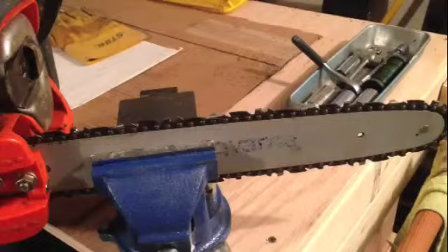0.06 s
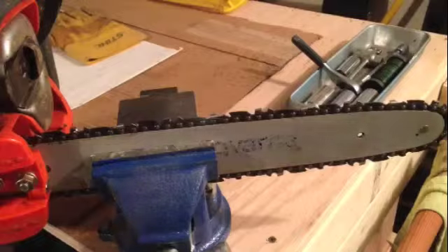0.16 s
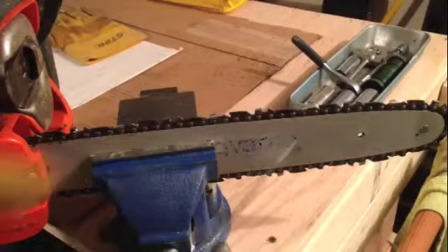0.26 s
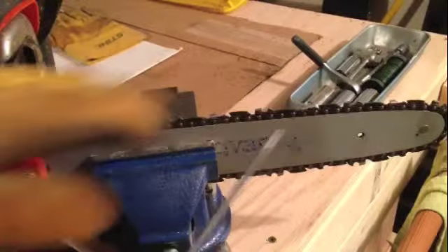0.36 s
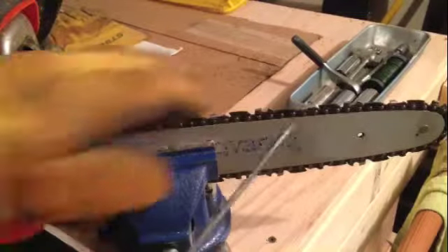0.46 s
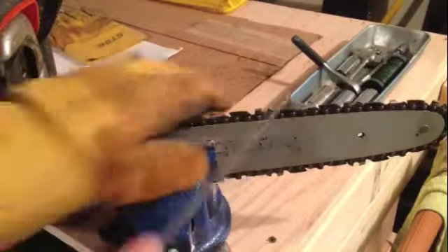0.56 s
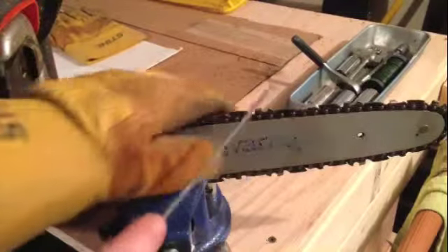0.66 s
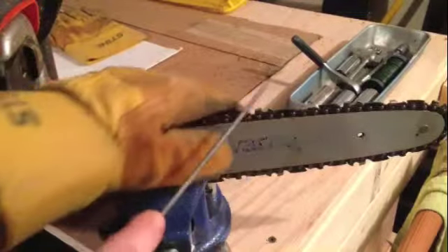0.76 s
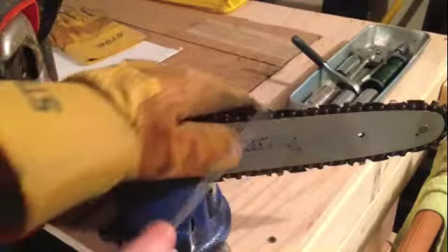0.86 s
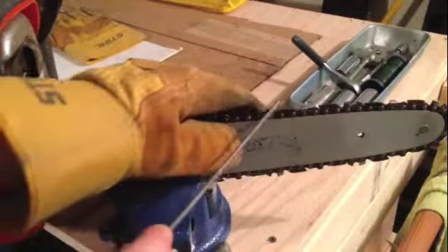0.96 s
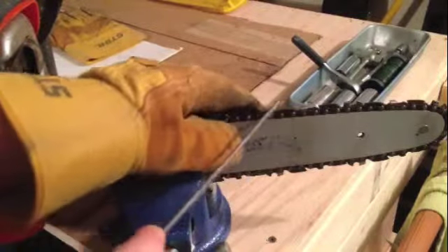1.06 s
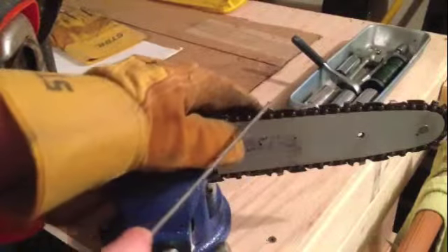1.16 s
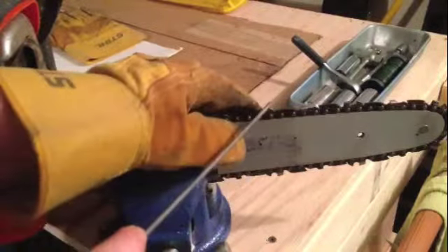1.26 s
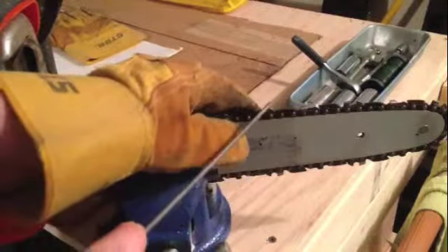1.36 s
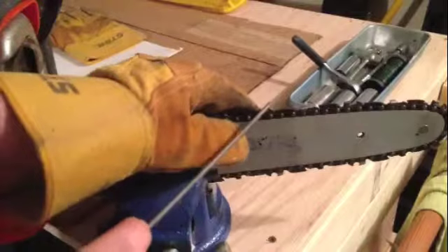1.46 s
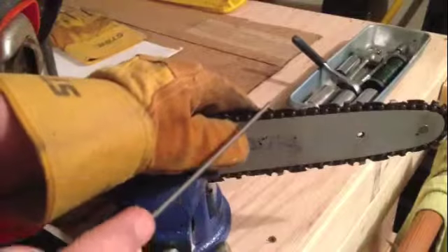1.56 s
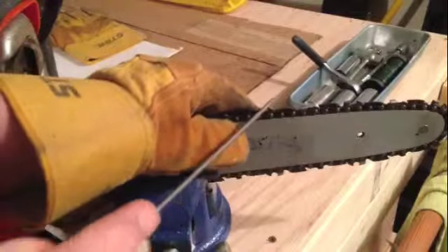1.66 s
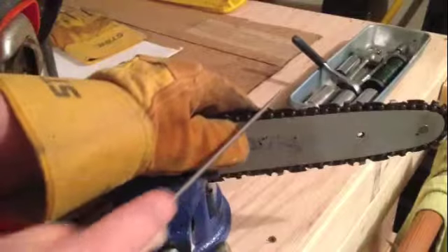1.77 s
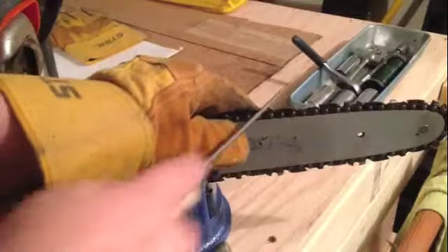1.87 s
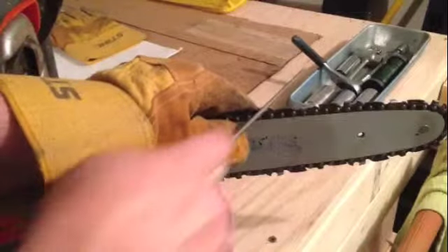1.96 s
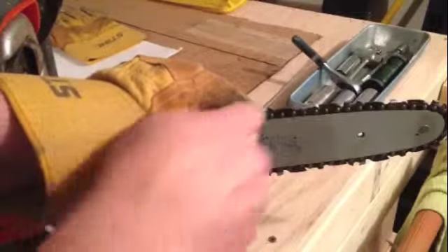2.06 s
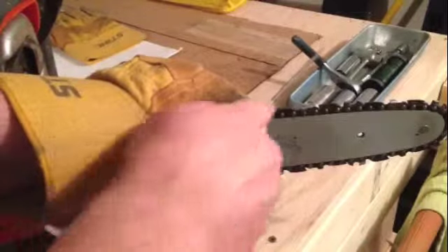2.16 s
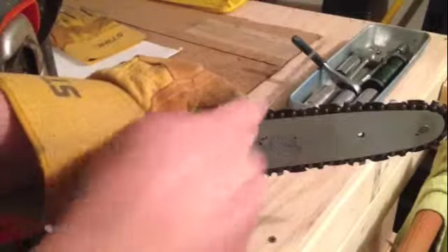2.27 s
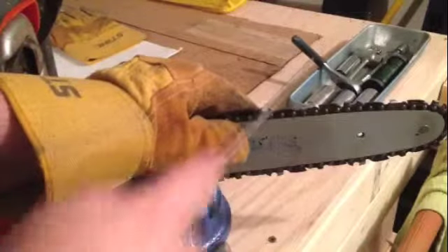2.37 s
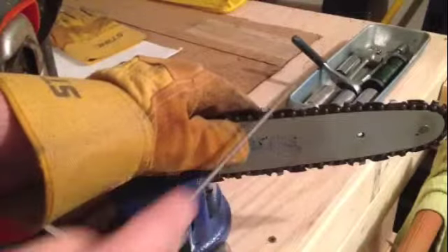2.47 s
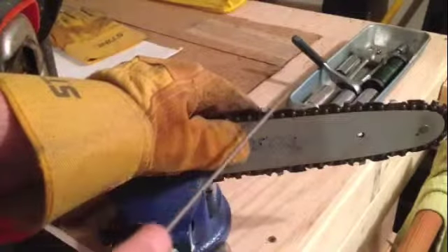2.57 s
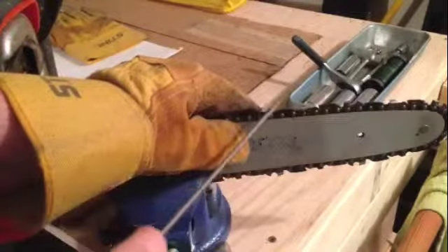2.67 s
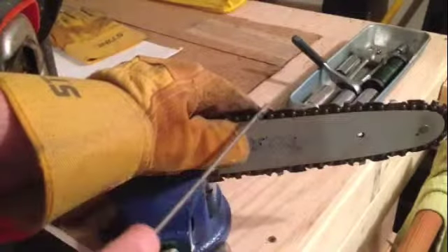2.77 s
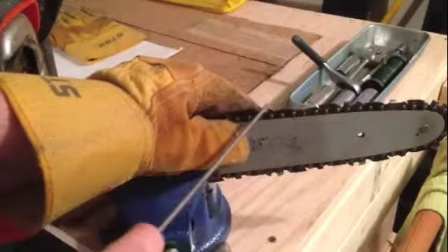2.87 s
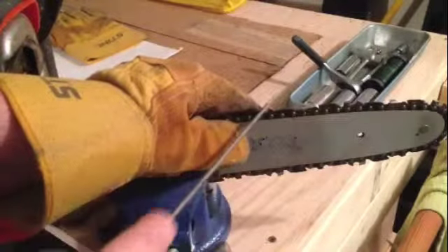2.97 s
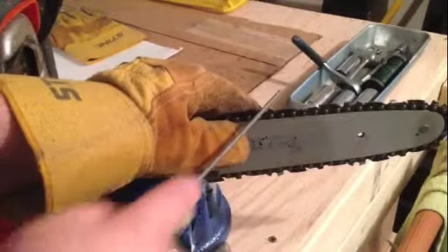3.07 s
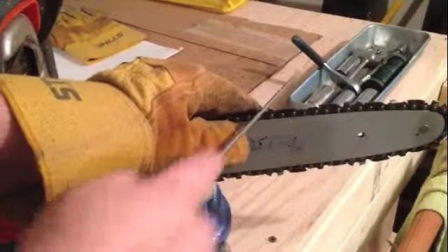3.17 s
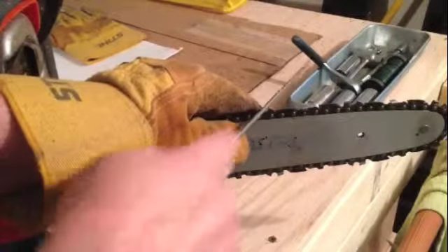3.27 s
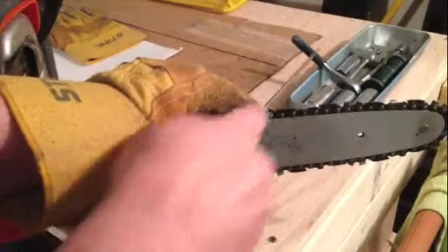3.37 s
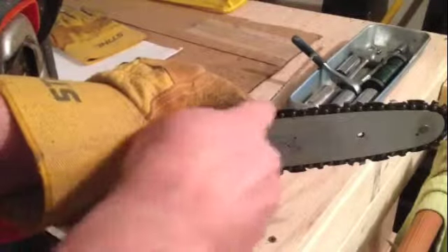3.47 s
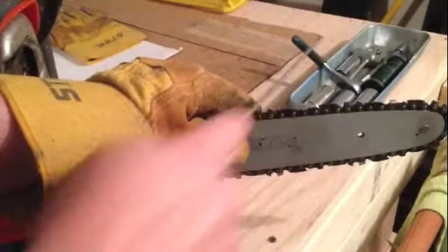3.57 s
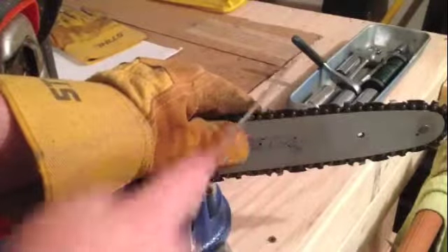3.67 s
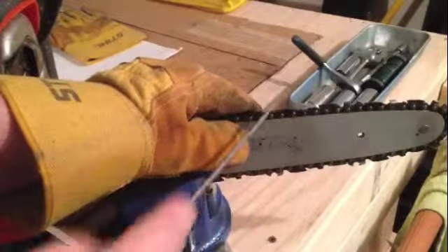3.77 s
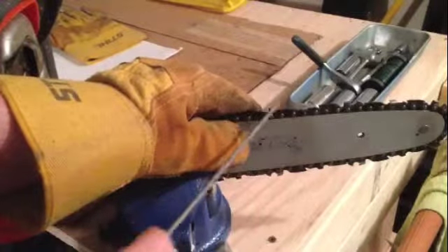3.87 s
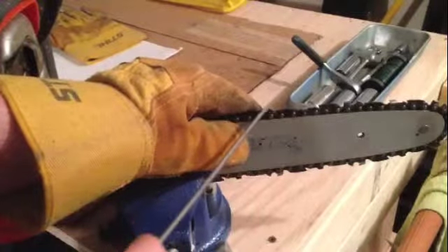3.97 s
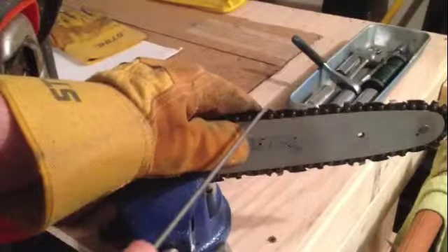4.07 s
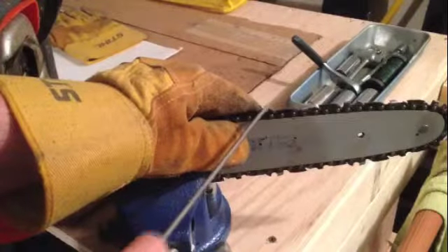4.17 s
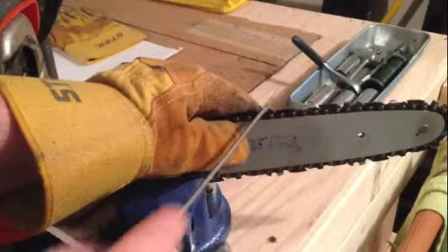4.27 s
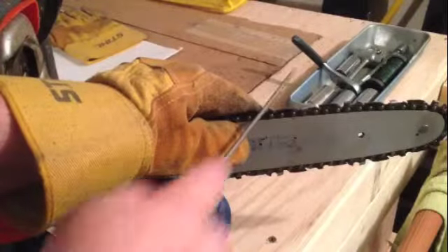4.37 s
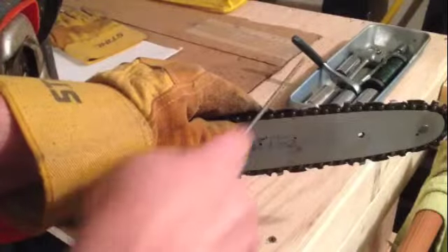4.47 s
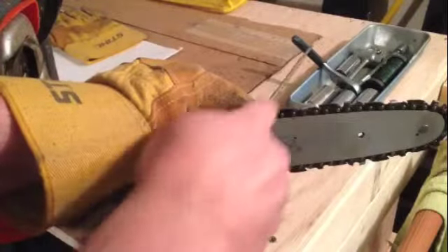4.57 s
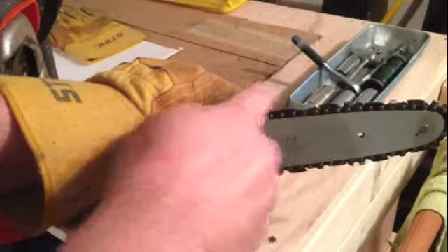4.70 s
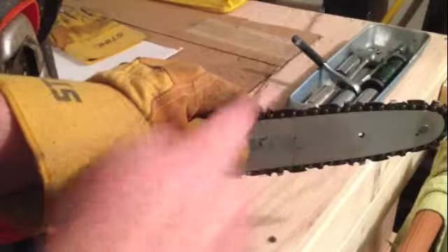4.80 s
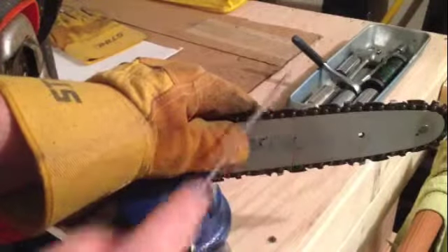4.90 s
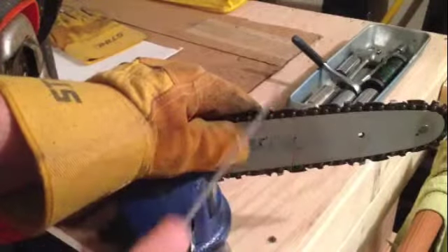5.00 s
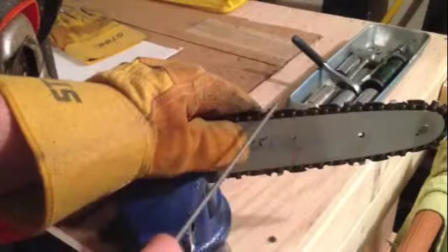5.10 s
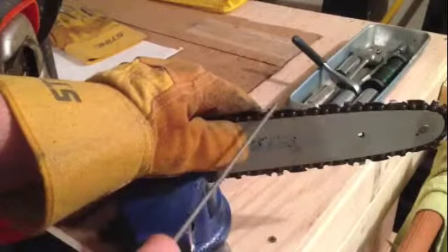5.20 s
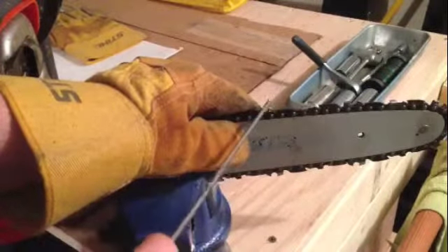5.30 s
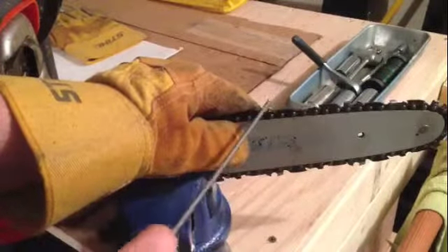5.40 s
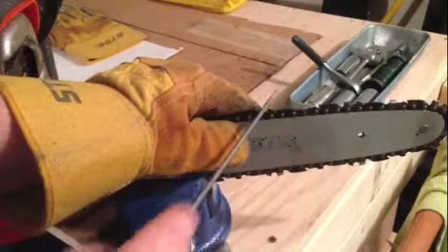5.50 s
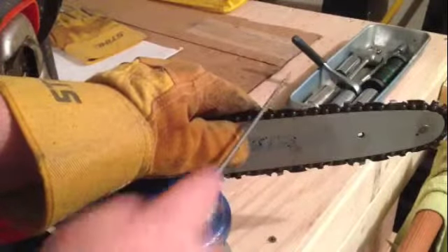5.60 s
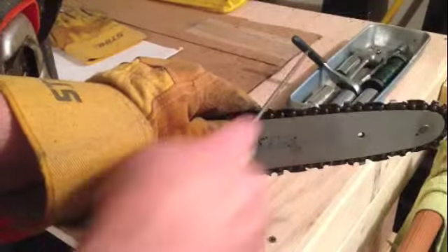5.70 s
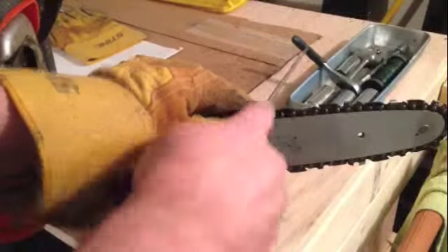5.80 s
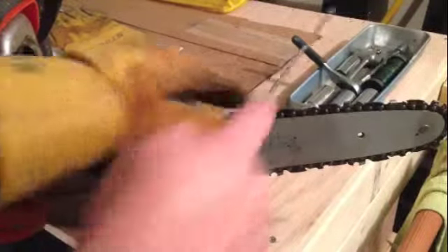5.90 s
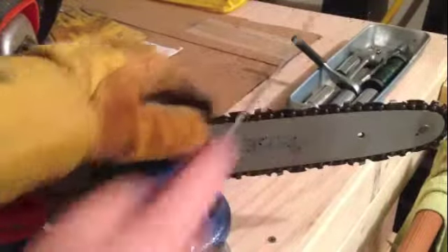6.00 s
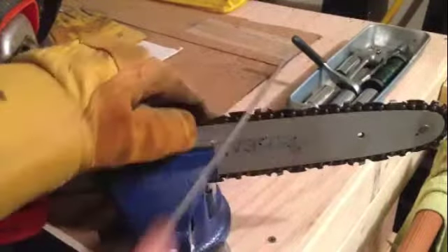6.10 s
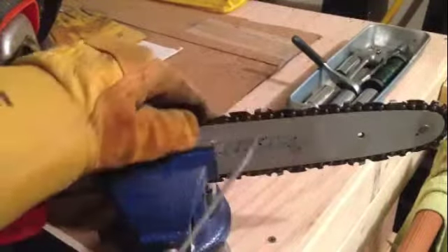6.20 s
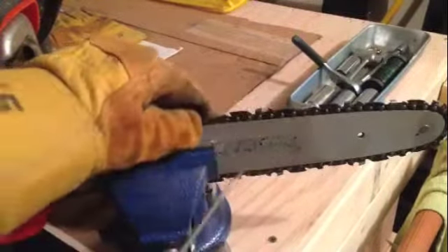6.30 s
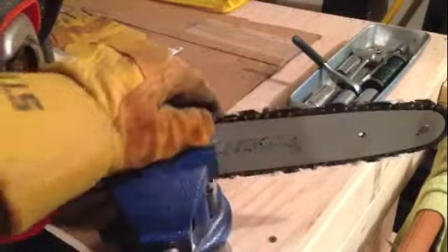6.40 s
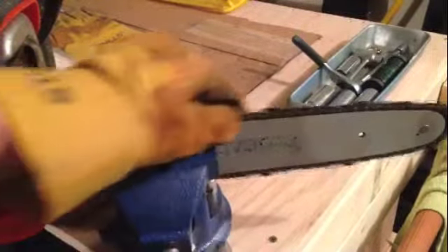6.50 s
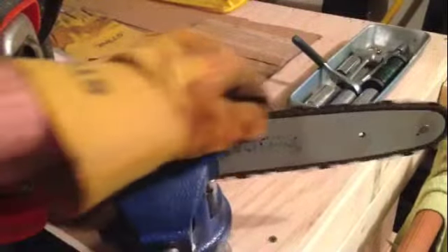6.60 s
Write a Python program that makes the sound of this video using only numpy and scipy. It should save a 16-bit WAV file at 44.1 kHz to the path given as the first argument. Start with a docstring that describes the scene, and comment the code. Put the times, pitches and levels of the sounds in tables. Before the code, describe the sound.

Close in a small cluttered workshop, leather gloves rustle and bump softly on bench and vise, then a thin file taps steel sharply. Four short, gritty push strokes follow, each rasping with a rising, buzzing whine. Between them come faint scraping returns, light skids and crisp taps. Finally chain links click loudly and the chain rattles along its bar. Small microphone, little bass, faint hiss.

```python
"""Filing a saw chain

A round file is pushed four times over a cutter of a saw chain whose bar sits in a bench vise, in a workshop.
Its teeth bite as noise pulsed at the tooth rate, which rings file, bar and bench through resonators.
Between strokes the file slides back, skates and taps the steel, heard as filtered clicks and decaying modes.
Links tick, gloved hands rustle and knock as shaped noise, and at the end the chain is pulled along the bar."""
import sys
import numpy as np
from scipy import signal
from scipy.fft import rfft, irfft
from scipy.io import wavfile
from scipy.ndimage import uniform_filter1d

SR = 44100
rng = np.random.default_rng(int(sys.argv[2]) if len(sys.argv) > 2 else 0)


def voltage_ratio(level):
    """Linear amplitude factor for a level in decibels (scalar or array-like)."""
    return 10 ** (np.asarray(level, float) / 20)


def master(y):
    """Save y as 16-bit WAV."""
    cut = np.clip(np.atleast_2d(y).T, -1, 1)
    pcm = np.round(cut * 32767)  # scale
    wavfile.write(sys.argv[1], SR, pcm.astype(np.int16))


N = 293265
TIME = np.arange(N) / SR

# bar, cutter and bench under the file: (frequency [Hz], width [Hz], level [dB])
HELD_STEEL = [(137.7, 8.8, -8), (170.5, 12.6, -6.5), (259.3, 11.7, 7.5), (357, 45, -4.5), (528, 59, 1),
              (1198, 520, -3.5), (2380, 25, -18), (2882, 207, 1), (3133, 150, -2.5), (3360, 83, -24),
              (4190, 54, -5), (4800, 1070, -7), (5490, 250, -6.5), (5860, 300, -9), (6620, 380, -7.5),
              (8480, 240, -10.5), (10600, 220, -14), (13400, 350, -19)]
# bending modes of the file: (frequency [Hz], level [dB], t60 at damping 0.5 [s])
FILE_MODES = [(1226, -2, 0.054), (2363, -4, 0.048), (3744, 3, 0.032), (5360, 1, 0.019), (6340, 0.5, 0.034),
              (7080, -22, 0.06), (8250, -10.5, 0.062), (10610, -3, 0.031), (12100, -21, 0.018),
              (13300, -9, 0.027), (14500, -33, 0.011)]


def unit(x):
    """Normalisation: scale to rms 1."""
    return x / np.sqrt(np.mean(x ** 2))


def band(x, lo_hz, hi_hz):
    """Band limitation by a Butterworth band-pass."""
    sos = signal.butter(2, [lo_hz, min(hi_hz, 0.45 * SR)], "band", fs=SR, output="sos")
    return signal.sosfilt(sos, x)


def colour(x, points):
    """Spectral shaping by (frequency [Hz], gain [dB]) points joined on a log-frequency axis."""
    hz, db = np.transpose(points)
    f = np.maximum(np.fft.rfftfreq(len(x), 1 / SR), 1)
    gain = voltage_ratio(np.interp(np.log(f), np.log(hz), db))
    return irfft(rfft(x) * gain, len(x))


def walk(rate):
    """Slow random modulation: independent levels, 1 / rate s apart, joined by ramps; rms 1."""
    k = int(SR / rate)
    held = np.repeat(rng.standard_normal(N // k + 1), k)
    return unit(uniform_filter1d(held, k)[:N])


def grit(per_s, spread_db):
    """Friction as a random impulse train: dense clicks of uneven size, rms 1."""
    hit = rng.random(N) < per_s / SR
    size = rng.standard_normal(N) * voltage_ratio(spread_db * rng.exponential(size=N))
    return unit(hit * size)


def three_way(x, low_hz, high_hz, ref_hz):
    """Band splitting into low, middle and upper parts, each at rms 1 (upper: within ref_hz)."""
    low, mid, high = band(x, 122, low_hz), band(x, low_hz, high_hz), band(x, high_hz, 15100)
    return unit(low), unit(mid), high / np.std(band(high, *ref_hz))


def resonate(x, peaks, wander_db, rate):
    """Parallel resonances, each swelling and fading on its own as the contact point moves."""
    out = 0
    for hz, width, db in peaks:
        b, a = signal.iirpeak(hz, hz / width, SR)
        out = out + voltage_ratio(db + wander_db * walk(rate)) * signal.lfilter(b, a, x)
    return out


def gestures(events, ramp_s):
    """Amplitude envelope of movements that swell, hold and ease off."""
    gain = 0
    for start, length, db in events:
        nearest_end = np.minimum(TIME - start, start + length - TIME)
        gain = gain + voltage_ratio(db) * np.clip(nearest_end / ramp_s, 0, 1)
    return gain


def strike(events, modes, crack_db):
    """Modal impact: a crack with a rough tail plus modes weighted by contact colour and damped by the grip."""
    low_modes_hz = 4500  # an event's optional low-mode level acts under this
    out, t = np.zeros(N + SR), np.arange(SR // 4) / SR
    hz, db, t60 = (c[:, None] for c in np.transpose(modes))
    for s, peak_db, contact_hz, damping, *low_db in events:
        chance = rng.standard_normal((3, len(modes), 1))
        contact_db = -2.26 * np.log2(hz / contact_hz) ** 2
        share = voltage_ratio(db + sum(low_db) * (hz < low_modes_hz) + 2.4 * chance[0] + contact_db)
        # decay time runs from twice t60 at damping 0 to a quarter of it at 1.5
        damped_t60 = t60 * 4 ** (0.5 - np.clip(damping, 0, 1.5))
        fade = np.exp(-np.log(1000) * t / damped_t60)
        # each mode rings unevenly
        fade = fade * (1 + 3.7 * uniform_filter1d(rng.standard_normal(fade.shape), size=60, axis=1))
        tone = np.sin(2 * np.pi * hz * (1 + 0.012 * chance[2]) * t)
        ring = np.sum(share * np.sign(chance[1]) * fade * tone, axis=0)
        # a sharp onset, then a weak buzz
        burst = rng.standard_normal(len(t)) * (np.exp(-t / 0.00024) + 0.054 * np.exp(-t / 0.0078))
        crack = band(burst, contact_hz / 1.47, contact_hz * 1.37)
        crack = band(crack, contact_hz / 2.23, 21000)
        blow = ring / np.abs(ring).max() + voltage_ratio(crack_db) * crack / np.abs(crack).max()
        blow = band(blow, 340, 21000)  # small steel parts radiate no bass
        i = int((s + 0.001) * SR)  # the blow starts 1 ms after its listed time
        out[i:i + len(t)] += voltage_ratio(peak_db) * blow / np.abs(blow).max()
    return out[:N]


def hiss():
    """Stationary noise floor of room and microphone: Gaussian noise with a shaped spectrum."""
    level_db = -63.5
    # spectrum of the floor: (frequency [Hz], gain [dB])
    floor_colour = [(18, -48), (30, -21), (81, -12), (256, 5), (324, -1.5), (1260, -11.5), (8500, -11),
                    (14300, -14.5), (15500, -12.5)]
    return voltage_ratio(level_db) * unit(colour(rng.standard_normal(N), floor_colour))


def rustle():
    """Fine friction of leather and cloth: coloured clicks whose bands flicker independently."""
    ramp_s, low_db = 0.11, -1
    # gloves and sleeves moving: (start [s], length [s], level [dB], leather creak over the level [dB])
    moves = [(0.002, 0.29, -59.5, -6), (0.251, 1.0, -58, -6), (1.302, 0.76, -66.5, -5.5),
             (2.15, 0.82, -63, -6.5), (3.497, 0.27, -61, -8), (3.88, 0.7, -60.5, -3.5),
             (4.65, 0.24, -63.5, -6), (5.0, 0.45, -59, -2.5), (5.42, 0.17, -61.5, -4),
             (5.85, 0.39, -57, -3.5), (6.192, 0.36, -58.5, -2)]
    # spectrum of the rubbing: (frequency [Hz], gain [dB])
    rub_colour = [(59, -55), (100, -6), (196, 9.5), (238, 6), (712, 13), (1090, -0.5), (1370, 0.5),
                  (3180, -17.5), (5750, -18), (6660, -20.5), (15500, -48)]
    low, mid, high = three_way(colour(grit(5000, 0.55), rub_colour), 457, 2404, (2500, 8000))
    high = high * voltage_ratio(1.3 * walk(25))
    rub = voltage_ratio(-2.0) * high + voltage_ratio(low_db + 2 * walk(11)) * low
    rub_gain = gestures([row[:3] for row in moves], ramp_s)
    creak_gain = gestures([(s, length, db + creak_db) for s, length, db, creak_db in moves], ramp_s)
    return rub_gain * rub + creak_gain * voltage_ratio(2 * walk(6.7)) * mid


def knocks():
    """Padded impacts: gloves excite a fading puff of noise in one broad band."""
    # blows on bench and vise: (time [s], peak level [dB], centre frequency [Hz], t60 [s])
    thuds = [(0.349, -36, 2700, 0.15), (0.349, -40, 900, 0.051), (0.479, -47.5, 1160, 0.16),
             (0.572, -34, 1240, 0.035), (0.591, -42, 1330, 0.088), (0.616, -45, 1400, 0.052),
             (0.849, -35.5, 566, 0.081), (0.85, -38.5, 1110, 0.048), (0.995, -36, 1440, 0.23),
             (1.089, -42.5, 1470, 0.083), (5.351, -39, 288, 0.03), (1.573, -49, 302, 0.29),
             (1.704, -30.5, 340, 0.54), (5.521, -36.5, 312, 0.2), (5.865, -51, 489, 0.11),
             (5.915, -44.5, 524, 0.12)]
    out, t = np.zeros(N + SR), np.arange(SR // 4) / SR
    for s, peak_db, hz, t60 in thuds:
        fade = np.exp(-np.log(1000) * t / t60) + 0.28 * np.exp(-t / 0.00033)
        puff = band(rng.standard_normal(len(t)) * fade, hz / 1.43, hz * 1.32)
        i = int(s * SR)
        out[i:i + len(t)] += voltage_ratio(peak_db) * puff / np.abs(puff).max()
    return out[:N]


def chain_drag():
    """Rattling contact excitation: links run in the groove of the bar and, once pulled, shake the bench."""
    start_s, pull_s, rise_s = 6.44, 6.49, 0.023  # links take up slack, then the pull
    slack_db, pull_db, sag_db_per_s, bench_db = -48, -36.5, -19, -9
    # spectrum of the rattle: (frequency [Hz], gain [dB])
    drag_colour = [(59, -60), (100, -36), (248, -1.5), (293, -12), (758, -6.5), (956, -28.5), (2090, -4.5),
                   (5630, 0.5), (15500, -21)]
    slack = voltage_ratio(slack_db) * np.clip((TIME - start_s) / rise_s, 0, 1)
    since_pull = (TIME - pull_s).clip(0)
    pull = np.clip(since_pull / rise_s, 0, 1) * voltage_ratio(pull_db + sag_db_per_s * since_pull)
    low, mid, high = three_way(colour(grit(7000, 0.82), drag_colour), 720, 1330, (2500, 10000))
    rattle = np.maximum(slack, pull) * (high + voltage_ratio(-9.0) * mid)
    return voltage_ratio(2 * walk(70)) * (rattle + voltage_ratio(bench_db) * pull * low)


def links():
    """Modal impacts of chain links clicking together, short and high."""
    # modes of a link: (frequency [Hz], level [dB], t60 at damping 0.5 [s])
    link_modes = [(3900, -24, 0.0028), (5660, 6, 0.0099), (6250, 0, 0.022), (7760, -19, 0.0015),
                  (10700, -12, 0.0075)]
    # clicks: (time [s], peak level [dB], contact colour [Hz], damping [0-1.5])
    clicks = [(1.417, -47, 6200, 0.7), (1.4458, -30, 5900, 0.1), (2.4757, -30, 6900, 1.4),
              (2.4865, -27, 6800, 1.4), (2.5037, -31.5, 6360, 1.4), (6.3769, -29, 6760, 0.4),
              (6.419, -10.5, 5400, 0), (6.4342, -16, 5930, 0.6), (6.4418, -10.5, 5840, 0.3),
              (6.4506, -23, 6240, 0), (6.4664, -34, 4950, 0.7)]
    return strike(clicks, link_modes, crack_db=5)


def skids():
    """Light sliding friction: the file skates on the cutter without cutting and its modes whisper."""
    # slides: (start [s], length [s], level at the swell [dB])
    slides = [(1.196, 0.014, -45.5), (2.582, 0.13, -54.5), (2.798, 0.023, -44.5), (2.892, 0.16, -64),
              (3.889, 0.12, -52.5), (4.015, 0.011, -42.5), (5.308, 0.026, -40), (5.48, 0.1, -48),
              (6.354, 0.073, -52.5)]
    pressure = 0
    for s, length, db in slides:
        swell = np.interp(TIME, [s, s + 0.57 * length, s + length], [0.3, 1, 0.6], 0, 0)
        pressure = pressure + voltage_ratio(db) * swell
    rub = grit(9700, 0.84)
    # sliding contact broadens the modes and favours those near 4200 Hz
    peaks = [(hz, 9 / t60, db - 5 * np.log2(hz / 4200) ** 2) for hz, db, t60 in FILE_MODES]
    whisper = resonate(rub, peaks, wander_db=4.0, rate=46) + 0.14 * band(rub, 2150, 5100)
    return uniform_filter1d(pressure, size=200) * unit(whisper)


def returns():
    """Resonant friction: drawn back lightly, the file scrapes and its whistle sinks as the hand slows."""
    whistle_db = -4
    # return strokes: (start [s], length [s], level [dB], whistle from [Hz], whistle to [Hz])
    glides = np.array([(2.25, 0.25, -63, 2250, 2160), (3.547, .22, -64, 1607, 1507),
                       (4.987, 0.4, -61, 1700, 1612), (5.878, 0.37, -60.5, 1923, 1290)])
    # resonances of the scrape: (frequency [Hz], width [Hz], level [dB])
    scrape_peaks = [(1520, 12, -20), (1647.3, 69, 2.5), (2144, 120, 5.5), (3570, 110, -0.5),
                    (4620, 150, -6), (5800, 130, -2.5), (7530, 83, -10)]
    ends = np.ravel([glides[:, 0], glides[:, 0] + glides[:, 1]], "F")
    hz = np.interp(TIME, ends, glides[:, 3:].ravel())
    whistle = walk(70) * np.sin(2 * np.pi * np.cumsum(hz) / SR)
    scrape = unit(resonate(grit(9000, 0.89), scrape_peaks, wander_db=3.0, rate=35))
    return gestures(glides[:, :3], 0.043) * (scrape + voltage_ratio(whistle_db) * whistle)


def catches():
    """Modal impacts of teeth catching on the cutter as a stroke starts, ringing the held steel."""
    t60_s = 0.014  # at damping 0.5
    # catches: (time [s], peak level [dB], contact colour [Hz], damping [0-1.5], low modes [dB])
    snags = [(1.69, -18, 4030, 0.5, 1.5), (1.7105, -29, 4100, 0.5, 5), (1.717, -50, 4570, 0.5, -1),
             (1.7462, -41, 3600, 0.5, -1), (1.7687, -27, 4870, 0.5, -1), (1.785, -34, 5200, 0.4, -1),
             (3.0178, -27.5, 4000, 0, -3), (3.1021, -24, 3970, 0.6, 1), (4.3056, -21, 2900, 0.6, 3),
             (5.5128, -34, 3900, 0.5, 9), (5.5357, -25.5, 5500, 0.58, -19), (5.5631, -21, 3380, 0, 3),
             (5.605, -26, 4800, 0.7, 2)]
    held = [(hz, db, t60_s) for hz, _, db in HELD_STEEL if 1000 < hz < 8000]
    return strike(snags, held, crack_db=-7)


def taps():
    """Modal impacts of the file on steel, exciting its bending modes."""
    # taps: (time [s], peak level [dB], contact colour [Hz], damping by the grip [0-1.5], low modes [dB])
    hits = [(0.9626, -19.5, 7800, 0.7, -27), (1.0246, -11, 6900, 0.95, -4.5),
            (1.2114, -11.5, 6170, 0.16, -7.5), (1.2176, -6.5, 7450, 0.8, -10), (1.386, -47, 7000, 1, 4),
            (1.2964, -34.5, 4700, 0.8, 2), (1.58, -32.5, 2800, 1, 4), (2.5745, -31, 3900, 0.2, -8),
            (2.5865, -30.5, 4300, 0.2, -6), (2.7655, -49, 3600, 0.5, 3), (2.819, -14.5, 4750, 1, -6.5),
            (2.8821, -12, 5240, 0.92, -5.5), (3.4818, -28, 5800, 0.3, 1), (3.891, -30, 7740, 0.6, -7),
            (3.927, -33.5, 3420, 1, 19), (4.0302, -9, 6340, 0.98, -4.5), (4.1759, -43.5, 3644, 0.36, -7),
            (4.2852, -29.5, 4290, 0, 3), (4.9831, -45, 11600, 1.1, -8), (5.0969, -18, 4420, 0.43, 0),
            (5.3327, -14, 5400, 1, 9), (5.3368, -12, 4650, 1, -6.5), (5.899, -26, 4400, 0.3, 5.5)]
    return strike(hits, FILE_MODES, crack_db=1.5)


def bite_db():
    """Level envelope of the push strokes, resting at -120 dB between them."""
    lift_s = 0.2  # the file leaves the steel
    # one list per push stroke, how hard the file bites: (time [s], rasp level [dB])
    strokes = [
        [(1.7, -39), (1.8, -36.5), (1.86, -33), (1.9, -29), (1.932, -22.5), (1.968, -28.5), (1.978, -23.5),
         (2.104, -30), (2.112, -26), (2.168, -37.5), (2.34, -61)],
        [(3.022, -42), (3.072, -42.5), (3.118, -30.5), (3.248, -30), (3.326, -34), (3.33, -32.5), (3.5, -41),
         (3.56, -50.5), (3.66, -75)],
        [(4.312, -30), (4.32, -37), (4.336, -30.5), (4.45, -28.5), (4.46, -29), (4.514, -34), (4.656, -31.5),
         (4.692, -55), (4.78, -71)],
        [(5.512, -64), (5.526, -40.5), (5.538, -37), (5.544, -38), (5.564, -31.5), (5.666, -28.5), (5.678, -25),
         (5.826, -30), (5.872, -52), (5.89, -46)],
    ]
    rows = []
    for stroke in strokes:
        rows += [(stroke[0][0] - 0.004, -120), *stroke, (stroke[-1][0] + lift_s, -120)]
    return np.interp(TIME, *np.transpose(rows))


def tooth_whine(phase):
    """Periodic excitation: the tooth train sings out at the tooth rate and its octave."""
    floor_db = -21  # the note never quite vanishes
    # singing moments, shares before the final mix:
    # (centre [s], half length [s], note amplitude [dB], octave amplitude [dB])
    whines = [(1.789, 0.13, 1, -5), (1.909, 0.074, -23, -6.5), (1.99, 0.087, -7, -13),
              (3.164, 0.021, -0.5, -17), (3.397, 0.09, -9, -4), (3.49, 0.034, 4.5, -26),
              (4.53, 0.11, -6.5, -17), (4.639, 0.014, -4.5, -16), (5.728, 0.11, -1, -10)]
    note, octave = np.sin(phase), np.sin(2 * phase)
    sing = voltage_ratio(floor_db) * note
    for s, half, db, octave_db in whines:
        swell = np.clip(1 - np.abs(TIME - s) / half, 0, 1)
        sing = sing + swell * (voltage_ratio(db) * note + voltage_ratio(octave_db) * octave)
    return sing * voltage_ratio(5.14 * walk(60))


def filing():
    """Pulsed noise into resonators: teeth tear chips off the cutter; the file chatters and at times whines."""
    knee_db = -39.5  # above this bite, bench and bar grow more slowly than the rasp
    bench_db, bench_follow, bench_lag_s = -41.5, 0.25, 0.02
    bar_db, bar_follow = -45, 0.61
    top_db, top_follow, top_tilt = -23, 0.18, 0.27  # harder bite is brighter
    scatter_hz = 40  # the teeth never pass quite evenly
    steel_ring = 4.5  # weight of the resonances against the bare chips
    # file speed as teeth passing the cutter: (time [s], tooth rate [Hz])
    teeth = [(1.702, 200.2), (1.83, 339.8), (1.88, 570), (1.935, 758.3), (1.98, 980), (2.049, 1043),
             (2.22, 550.6), (3.03, 351), (3.11, 700), (3.166, 850.4), (3.37, 849), (3.45, 697),
             (3.5, 576.3), (3.599, 520.3), (4.319, 499.4), (4.41, 1104), (4.58, 1054), (4.639, 797.5),
             (4.719, 503.6), (5.539, 330.2), (5.62, 1001), (5.66, 1190), (5.741, 1209), (5.79, 1264),
             (5.85, 785)]
    # spectrum of the rasp: (frequency [Hz], gain [dB])
    rasp_colour = [(59, -30), (100, -19), (156, -2.5), (205, -3.5), (253, -2.5), (429, -5), (541, -1),
                   (1210, -7.5), (2220, -11.5), (3050, -12.5), (3770, -3.5), (5750, -10), (7890, -17.5),
                   (13100, -15), (15500, -17)]
    # colour as the contact travels along the file: (time [s], gain of lower over upper rasp [dB])
    rasp_tilt = [(1.7, 2.5), (1.91, -0.5), (2.13, 2), (3.05, 4.5), (3.24, -1.2), (3.4, 4.5), (3.5, 1),
                 (4.35, 1), (4.47, -3), (4.56, 3.5), (4.66, 1), (5.56, 5.5), (5.62, -0.5), (5.72, -3),
                 (5.8, 0)]

    rasp_db = bite_db()
    over = rasp_db - knee_db
    tooth_hz = np.interp(TIME, *np.transpose(teeth))
    phase = 2 * np.pi * np.cumsum(tooth_hz + scatter_hz * walk(150)) / SR
    # chips break mostly as a tooth engages, the more plainly the slower the file
    engage = (1 + np.cos(phase)) ** np.clip(250 / tooth_hz, 0.2, 0.7)
    chips = grit(14000, 0.86) * engage
    ring = resonate(chips, HELD_STEEL, wander_db=2.6, rate=30)
    steel = colour(chips + steel_ring * ring, rasp_colour)
    low, mid, high = three_way(steel, 519, 2000, (2500, 7500))

    bench_gain = voltage_ratio(bench_db + np.minimum(over, bench_follow * over))
    step = 1 / (bench_lag_s * SR)  # one-pole lag: the bench follows the bite slowly
    bench = low * signal.lfilter([step], [1, step - 1], bench_gain) * voltage_ratio(1.09 * walk(30))
    bar = mid * voltage_ratio(bar_db + np.minimum(over, bar_follow * over) + 1.4 * walk(60))

    body, top = band(high, 1740, 8600), unit(band(high, 8600, 13900))
    tilt_db = np.interp(TIME, *np.transpose(rasp_tilt))
    body = voltage_ratio(tilt_db / 2) * band(body, 1910, 3740) + voltage_ratio(-tilt_db / 2) * band(body, 5100, 10060)
    top = top * voltage_ratio(top_db + top_follow * over - top_tilt * tilt_db + 2.4 * walk(28))
    chatter = voltage_ratio(1.42 * walk(40) + 0.96 * walk(160))  # the file bites, lets go, bites again
    rasp = chatter * (body + top) + 0.58 * tooth_whine(phase)
    return voltage_ratio(rasp_db) * rasp + bar + bench


def smear(blows):
    """Random modulation: the ring of a blow comes back from the room smeared, not as clean lines."""
    share = 0.82  # power share of the modulated part
    return blows * (np.sqrt(1 - share) + np.sqrt(share) * walk(900))


def workshop(direct, sent):
    """Diffuse reverberation of a small cluttered room: decaying noise, the treble dying first."""
    tail_db, t60_low_s, t60_high_s = -15.5, 0.46, 0.2
    t = np.arange(SR // 2) / SR
    onset = np.clip((t - 0.002) / 0.0026, 0, 1)
    low = band(rng.standard_normal(len(t)), 83, 3560) * np.exp(-np.log(1000) * t / t60_low_s)
    high = band(rng.standard_normal(len(t)), 1400, 10300) * np.exp(-np.log(1000) * t / t60_high_s)
    tail = onset * (1.4 * low + high)
    tail = tail / np.linalg.norm(tail)
    return direct + voltage_ratio(tail_db) * signal.fftconvolve(sent, tail)[:N]


def scene():
    """Superposition: rubs and blows excite the room; rustle and hiss are added dry."""
    blows = links() + catches() + taps()
    rubs = knocks() + chain_drag() + skids() + returns() + filing()
    in_room = workshop(rubs + blows, rubs + smear(blows))
    return (in_room + rustle() + hiss())[None]


def top_cut(x):
    """Nothing passes above the cut-off."""
    return signal.sosfilt(signal.butter(12, 16500, fs=SR, output="sos"), x)


def record(dry):
    """Band limitation of a small microphone: no deep bass, no top octave."""
    dry = signal.sosfilt(signal.butter(3, 95, "high", fs=SR, output="sos"), dry)
    dry = signal.sosfilt(signal.ellip(6, 0.5, 24, 15300, fs=SR, output="sos"), dry)
    return top_cut(dry)


dry = scene()
out = record(dry)
master(out)
```